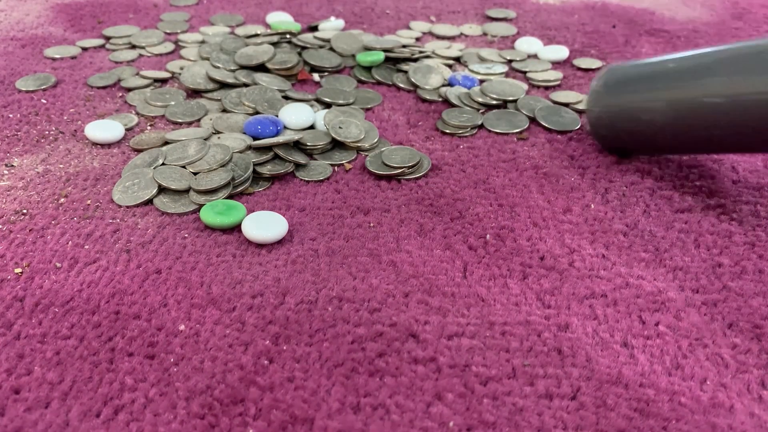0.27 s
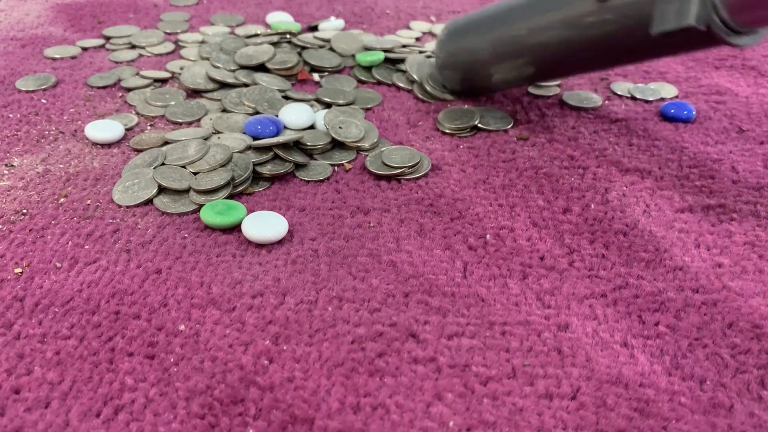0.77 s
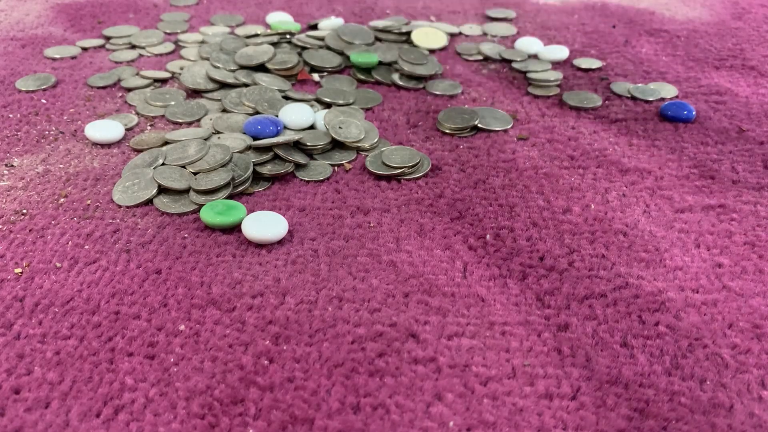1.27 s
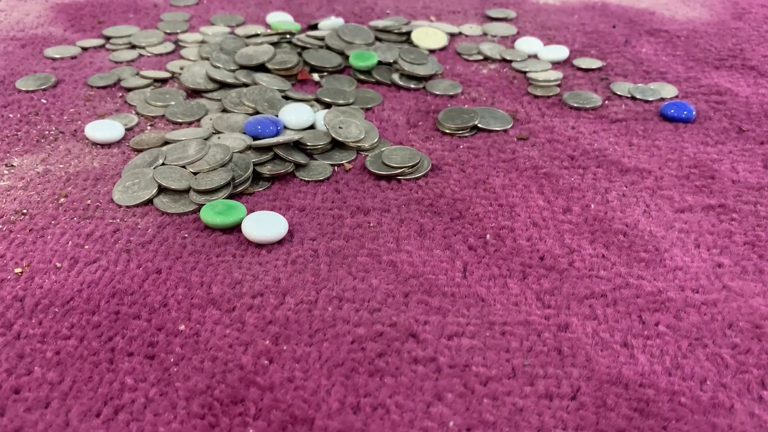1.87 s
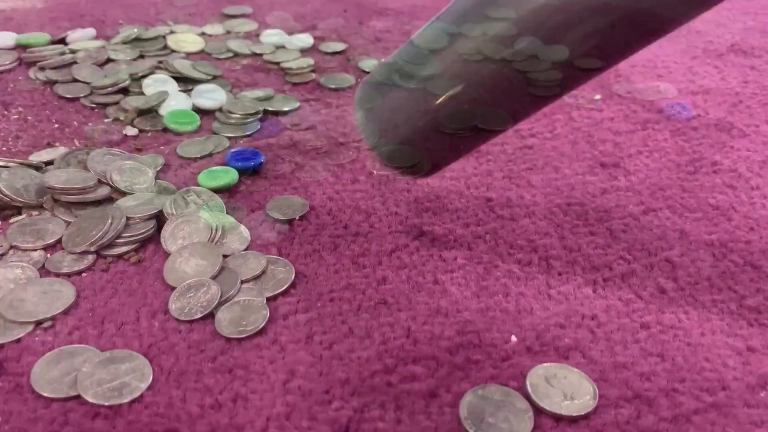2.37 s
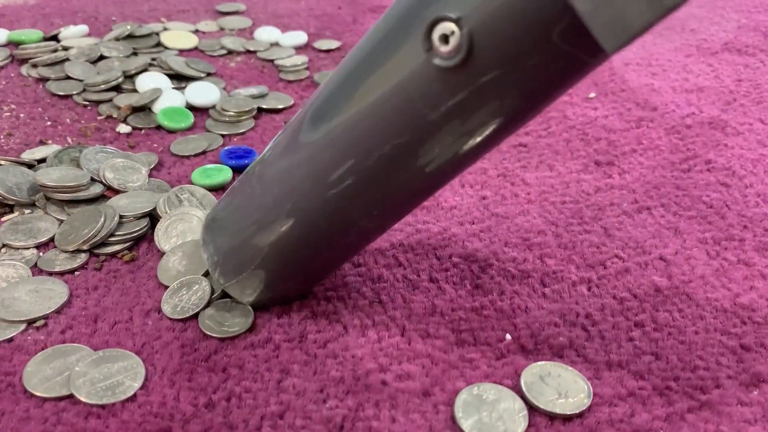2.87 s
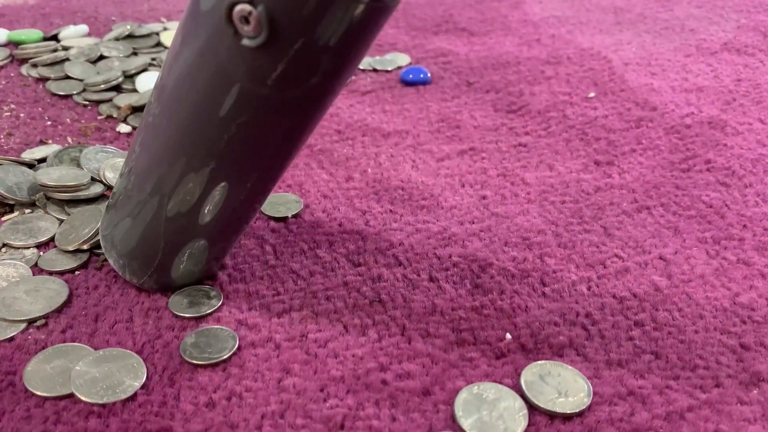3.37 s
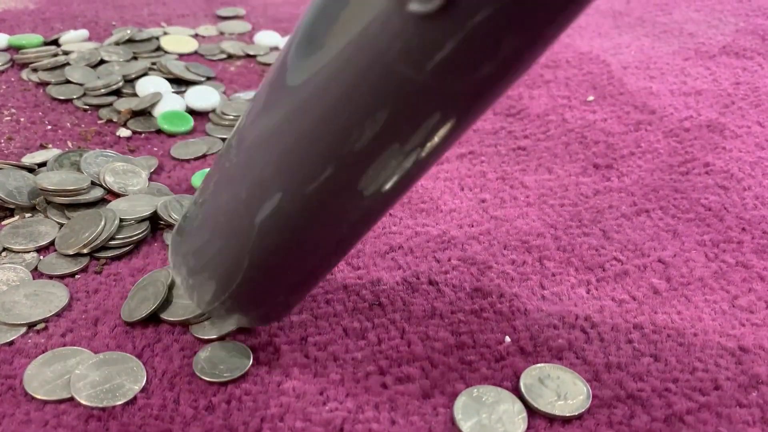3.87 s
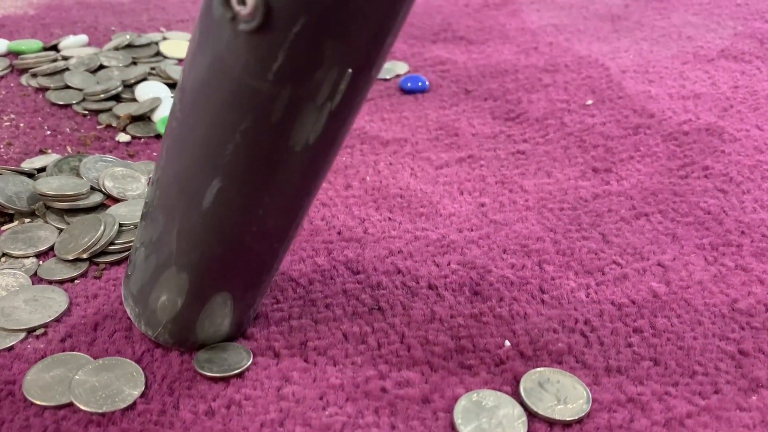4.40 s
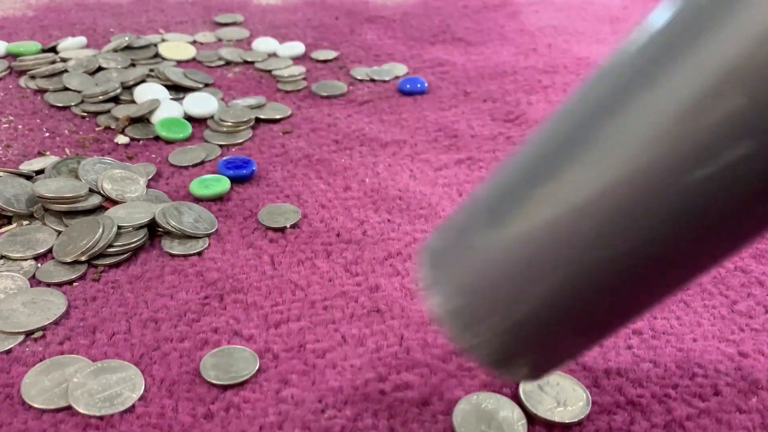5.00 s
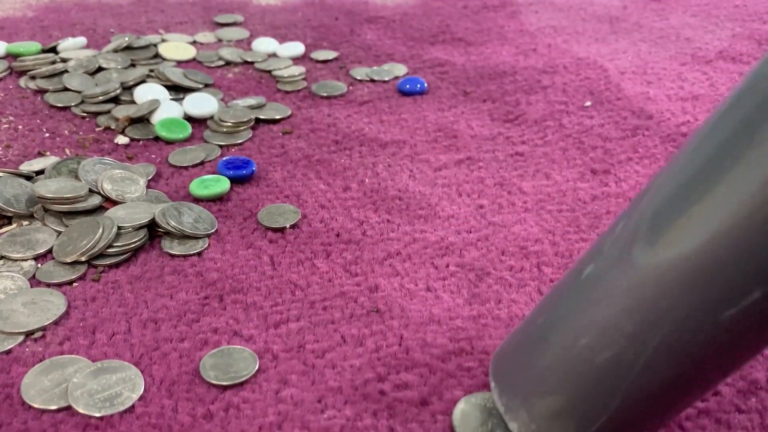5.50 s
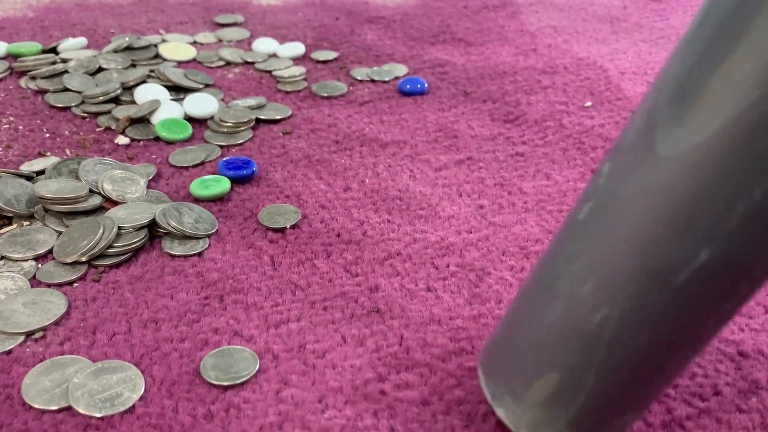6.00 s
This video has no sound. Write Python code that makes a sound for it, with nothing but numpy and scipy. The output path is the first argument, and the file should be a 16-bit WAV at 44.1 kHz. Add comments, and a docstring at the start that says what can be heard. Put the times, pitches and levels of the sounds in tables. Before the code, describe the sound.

A vacuum cleaner rushes steadily while its wand sucks coins and glass gems off carpet, clattering sharply up the hard tube in bursts.

```python
"""A vacuum cleaner runs while its wand picks coins and glass gems off a carpet, close to the microphone.
Shaped noise makes the rush of air and the hiss at the mouth; wavering sine tones make a faint motor whine.
Pieces clack together as short tones with noisy cracks, and tumble as streams of tiny ticks.
Blows on the tube wall ring clusters of close modes; the hardest overload the microphone.
The rim rasps and knocks, ringing the hollow nozzle; the wand bumps with low thuds, and a small room answers."""
import sys
import numpy as np
from scipy import signal
from scipy.fft import rfft, irfft
from scipy.io import wavfile

SR = 44100
rng = np.random.default_rng(int(sys.argv[2]) if len(sys.argv) > 2 else 0)


def digitize_waveform(pressure):
    """Quantize a signal to 16-bit integers and store it at the path in sys.argv[1].

    Rows of a 2-D input are taken as channels; values are limited to [-1, 1].
    """
    field = np.atleast_2d(pressure).T
    bounded = np.clip(field, -1, 1)
    quanta = np.round(bounded * 32767).astype(np.int16)
    wavfile.write(sys.argv[1], SR, quanta)


N = 275625  # length of the scene in samples

# colour of a hard contact's crack: (frequency [Hz], level [dB per Hz])
CRACK_SPECTRUM = [(60, -16.5), (900, -10.5), (2100, -1.5), (3600, 3), (5000, -3), (9000, -3), (16000, -8)]
CUTOFF_HZ = 16000  # top of the sound
NOZZLE_HZ, NOZZLE_Q = 2430, 4.3  # pitch and sharpness of the hollow nozzle's resonance


def from_db(db):
    """Turn decibels into a gain."""
    return 10 ** (np.asarray(db) / 20)


def rms_one(x):
    """Scale each row to unit power."""
    power = np.mean(x ** 2, axis=-1, keepdims=True)
    return x / np.sqrt(power + 1e-20)


def in_time(rows, outside=None):
    """Join the rows of a curve by straight lines, giving one signal per column after the time."""
    s, *columns = np.transpose(rows)
    t = np.arange(N) / SR
    return [np.interp(t, s, column, outside, outside) for column in columns]


def drift(rate_hz):
    """Slow random wander of spread 1: smoothed noise, made at every 40th sample and joined by lines."""
    step, warm_up = 40, 2000
    r = np.exp(-2 * np.pi * rate_hz * step / SR)
    noise = rng.standard_normal(N // step + warm_up + 2)
    slow = signal.lfilter([1], [1, -2 * r, r * r], noise)[warm_up:]
    return np.interp(np.arange(N) / step, np.arange(len(slow)), rms_one(slow))


def colour(x, spectrum):
    """Filter a sound to follow a spectrum, with no sound ahead of its cause (minimum phase)."""
    size = 2048
    hz, db = np.transpose(spectrum)
    grid = np.maximum(np.arange(size // 2 + 1) * SR / size, 1)
    gains = from_db(np.interp(np.log(grid), np.log(hz), db))
    # folding the cepstrum forward in time gives the minimum-phase response
    cepstrum = irfft(np.log(gains))
    fold = np.r_[1, np.full(size // 2 - 1, 2), 1, np.zeros(size // 2 - 1)]
    response = irfft(np.exp(rfft(cepstrum * fold)))
    response = response.reshape((1,) * (x.ndim - 1) + (-1,))
    return signal.fftconvolve(x, response, axes=-1)[..., :x.shape[-1]]


def place(times, db, sounds, span_s):
    """Lay one sound at each time, setting its level over its first span_s seconds."""
    out = np.zeros(N + sounds.shape[1])
    power = np.mean(sounds[:, :int(span_s * SR)] ** 2, axis=1)
    gains = from_db(db) / np.sqrt(power)
    for s, gain, sound in zip(times, gains, sounds):
        at = int(s * SR)
        out[at:at + len(sound)] += gain * sound
    return out[:N]


def air(flutter_db):
    """The machine's broad rush, and a brighter, fluttering hiss as the mouth nears the carpet."""
    # air flow, the rush ahead of a 1 dB lift: (time [s], rush level [dB], hiss level [dB])
    flow = [(0,-34.5,-39), (.27,-34,-37.5), (.4,-35.5,-32.5), (.8,-33.5,-40), (1.35,-29.5,-33.5),
            (1.65,-35,-40.5), (2.05,-38,-29.5), (2.2,-40,-39.5), (2.4,-39.5,-36.5), (2.62,-36.5,-32.5),
            (3.1,-35.5,-34), (4.1,-34.5,-34.5), (4.22,-36.5,-24.5), (4.78,-29.5,-37), (4.9,-34.5,-38.5),
            (5.3,-32.5,-35.5), (5.95,-37,-32.5), (6.25,-34.5,-36)]
    # colour of the rush: (frequency [Hz], level [dB per Hz])
    rush_spectrum = [(25, -23), (160, -8), (350, -2), (550, -5), (1000, 3), (1850, 0), (2500, -14.5),
                     (5000, -14.5), (9000, -18), (16000, -19.5)]
    # colour of the hiss: (frequency [Hz], level [dB per Hz])
    hiss_spectrum = [(400, -21.5), (1400, -10.5), (2100, 2), (3300, -1), (4500, -5.5), (6000, -10),
                     (10000, -16.5), (16000, -24)]
    rush_db, hiss_db = in_time(flow)
    rush_gain = from_db(rush_db + 1.0 + .5 * drift(29))
    rush = rush_gain * rms_one(colour(rng.standard_normal(N), rush_spectrum))
    hiss_gain = from_db(hiss_db + flutter_db * drift(17))
    hiss = hiss_gain * rms_one(colour(rng.standard_normal(N), hiss_spectrum))
    return rush + hiss


def motor():
    """Thin tones of the motor and its fan, all wandering slightly in pitch together."""
    # motor and fan tones: (frequency [Hz], level [dB], wander [Hz])
    whine = [(733.5, -55.5, 2.03), (10400, -57.5, 12), (74, -62.5, 1.02)]
    # extra level of the first tone, which fades into the rush: (time [s], level [dB])
    first_tone_level = [(.4, 12.5), (2.0, 3.5), (2.4, 2)]
    wander = drift(1.005)
    tones = []
    for hz, db, wander_hz in whine:
        phase = 2 * np.pi * np.cumsum(hz + wander_hz * wander) / SR
        tones.append(from_db(db) * np.sqrt(2) * np.sin(phase))
    first_db, = in_time(first_tone_level)
    return tones[0] * from_db(first_db) + sum(tones[1:])


def jostle(per_s, size_db, cycles, grit_db, count=16):
    """Small pieces tumble up the tube; each touch is a tick at one of count pitches, with a little crack."""
    # one table per mouthful of pieces, silent outside it: (time [s], level of the ticks [dB])
    mouthfuls = [
        [(.43,-22.5), (.48,-23.5)],
        [(.53,-27), (.6,-42), (.78,-33), (.86,-22), (.94,-24), (1.03,-28.5), (1.26,-21), (1.42,-21.5),
         (1.5,-34.5)],
        [(3.17,-35), (3.37,-30.5), (3.75,-31), (4.14,-36.5), (4.21,-25.5), (4.5,-26.5), (4.78,-25.5),
         (4.88,-39.5)],
        [(5.38,-36), (5.47,-32), (5.65,-42.5), (6.03,-30.5), (6.14,-41), (6.25,-53)],
    ]
    # colour of the ticks: (frequency [Hz], level [dB per Hz])
    tick_spectrum = [(500, -8.5), (2000, -4), (3300, -2), (6000, -2.5), (9000, -5), (16000, -25)]
    level, = sum(from_db(in_time(rows, outside=-120)) for rows in mouthfuls)
    sizes = from_db(size_db * np.clip(rng.standard_normal(N), -2, 2))
    hits = sizes * (rng.random(N) < per_s / SR)
    dealt = rng.integers(0, count, N)  # which pitch each touch gets
    ticks = 0
    for k, hz in enumerate(np.geomspace(2100, 8800, count)):
        r = from_db(-60 * hz / (cycles * SR))  # falls 60 dB in this many cycles
        w = 2 * np.pi * hz / SR
        own_hits = hits * (dealt == k) + 1e-18
        ticks = ticks + signal.lfilter([0, np.sin(w)], [1, -2 * r * np.cos(w), r * r], own_hits)
    grit_fade = signal.lfilter([1], [1, -from_db(-60 / (0.0074 * SR))], hits + 1e-18)
    grit = grit_fade * rng.standard_normal(N)
    ticks = rms_one(colour(ticks, tick_spectrum))
    return level * (ticks + from_db(grit_db) * rms_one(colour(grit, CRACK_SPECTRUM)))


def cracks(count, t60, tail_db, tail_t60):
    """A hard contact is a fast-fading burst of noise, with a weaker, slower-fading noise tail."""
    t = np.arange(int(SR / 20)) / SR
    fade = from_db(-60 * t / t60) + from_db(tail_db - 60 * t / tail_t60)
    return colour(rng.standard_normal((count, len(t))) * fade, CRACK_SPECTRUM)


def clacks(rows, t60, knock_db, crack_db, reach):
    """Each loose contact is a quickly damped tone plus a crack; lower contacts have a duller crack."""
    s, db, hz = np.transpose(rows)
    t = np.arange(int(SR / 50)) / SR
    knocks = np.sin(2 * np.pi * np.outer(hz, t)) * from_db(-60 * t / t60)
    snaps = cracks(len(s), t60=0.0054, tail_db=-12.5, tail_t60=0.021)
    edges = np.minimum(reach * hz, CUTOFF_HZ)  # the crack reaches this high [Hz]
    dulled = []
    for edge, snap in zip(edges, snaps):
        b, a = signal.butter(2, edge, fs=SR)
        dulled.append(signal.lfilter(b, a, snap))
    knock_layer = place(s, db + knock_db, knocks, span_s=0.0027)
    return knock_layer + place(s, db + crack_db, np.array(dulled), span_s=0.003)


def tube_ring(times, db, reach, damping, uneven_db, count=14):
    """Each ring mode has a ladder of lengthwise overtones; the upper ones die first, so the ring sinks."""
    # ring modes of the tube's cross-section:
    # (lowest frequency [Hz], spread of its overtones [Hz], level [dB], 60 dB fade of the lowest [s])
    tube_modes = [(1866, 380, 2.5, 0.039), (5270, 676, 1, 0.1), (10056, 910, -2.5, 0.1)]
    t = np.arange(int(SR * .15)) / SR
    k = np.arange(count)
    ladder = (k / count) ** 2
    spot = reach * rng.uniform(0.19, 1, (len(times), 1))  # where along the tube the piece lands
    out = 0
    for hz, spread_hz, mode_db, t60 in tube_modes:
        modes = np.sin(2 * np.pi * np.outer(hz + spread_hz * ladder, t))
        modes *= from_db(-60 * np.outer(1 + damping * ladder, t) / t60)
        # the landing spot decides how strongly each overtone is struck, with some chance
        chance = 1 + 0.72 * rng.standard_normal((len(times), count))
        weights = np.cos(np.pi * k * spot) * np.sqrt(k + 1) * chance
        gains = from_db(mode_db + uneven_db * rng.standard_normal((len(times), 1)))
        out = out + gains * (weights @ modes)
    return place(times, db, out, span_s=0.0028)


def strikes(rows):
    """Pieces skid against the tube wall with a noisy crack and set it ringing."""
    s, db, ring_db = np.transpose(rows)
    bursts = cracks(len(s), t60=0.0078, tail_db=-16, tail_t60=0.033)
    skids = place(s, db + 2.0, bursts, span_s=0.0031)
    return skids + tube_ring(s, ring_db + 2.0, reach=0.33, damping=7, uneven_db=2.8)


def bumps(t60, corner_hz, level_db):
    """The wand knocks softly on the carpet: a short burst of noise with only its lows left."""
    # dull bumps, relative to level_db: (time [s], level [dB])
    thud_rows = [(0.603, -13), (0.706, -8), (0.874, -6), (1.233, -8), (1.371, -2), (1.6, -24), (1.969, -30),
                 (2.745, -26), (3.579, -14), (3.78, -13), (4.318, -10), (4.692, -20), (4.794, -21),
                 (5.484, -12), (5.634, -22), (6.172, -15)]
    s, db = np.transpose(thud_rows)
    t = np.arange(int(SR / 10)) / SR
    push = rng.standard_normal((len(s), len(t))) * from_db(-60 * t / t60)
    thuds = signal.sosfilt(signal.butter(2, corner_hz, fs=SR, output="sos"), push)
    return place(s, db + level_db, thuds, span_s=0.01)


def ricochets(count=24):
    """Each handful bounces on at uneven gaps; gives wall strikes (s, dB, ring dB) and clacks (s, dB, Hz)."""
    # handfuls going up the tube, levels relative:
    # (start [s], length [s], contact level [dB], tube ring level [dB])
    handfuls = [(0.669, .14, -8, -10.5), (0.922, .07, -18.5, -19), (1.061, .055, -15.5, -10.5),
                (1.141, .025, -10, -14), (1.196, .045, -9.5, -9), (1.245, .075, -5, -3),
                (1.36, .036, -13, -13), (3.822, .03, -21, -21), (4.33, .24, -19.5, -25.5),
                (5.412, .012, -15.5, -13.5), (6.08, .008, -7, -20)]
    # range of the clacks' pitches: (lowest [Hz], highest [Hz])
    lowest_hz, highest_hz = (1880, 5600)
    rate_per_s, uneven = 85, .45  # typical rate; log spread of the gaps
    spread_db = 4  # spread of strength
    wall_share = .65  # chance that a bounce hits the wall; otherwise it hits another piece
    on_wall, on_piece = [], []
    for start, length, db, ring_db in handfuls:
        gap, force, ring = rng.standard_normal((3, count))
        target, size = rng.random((2, count))
        gaps = np.exp(uneven * gap) / rate_per_s
        s = start + np.cumsum(gaps) - gaps[0]
        inside = s < start + length
        wall = target < wall_share
        level = db + spread_db * force
        ring_level = ring_db + spread_db * ring
        hz = lowest_hz * (highest_hz / lowest_hz) ** size
        on_wall.append(np.c_[s, level, ring_level][inside & wall])
        on_piece.append(np.c_[s, level, hz][inside & ~wall])
    return np.vstack(on_wall), np.vstack(on_piece)


def coins():
    """The single hard blows and clacks, and the ricochets between them."""
    # hardest single blows on the wall, relative: (time [s], peak level [dB], tube ring level [dB])
    hard_blows = [(0.5453, 2, -25), (0.5942, 3, -18), (0.6052, 6, -10), (0.6319, 11, -8.5),
                  (0.6416, -3, -23), (0.6632, 2, -9), (0.6887, 0, -9.5), (0.7095, 4, -10),
                  (0.7474, 7, -11.5), (0.772, -4, -13), (0.7981, 2, -10), (0.82, 1, -14), (0.9774, -8, -19),
                  (1.0099, -3, -13.5), (1.0566, -12, -21), (1.1403, 6, -11), (1.1839, 10, 0), (1.26, 5, 1),
                  (1.2899, 1, 0), (1.3489, 7, -9), (1.3846, 6, -17), (3.321, -7, -25.5), (3.4206, -8, -27),
                  (3.4544, 3, -19), (3.5118, 2.5, -19), (3.5439, -2.5, -27), (3.591, -6, -20),
                  (3.6135, 6, -11.5), (3.6965, 4.5, -22), (3.7773, -2, -22), (3.8043, 1, -18),
                  (4.4115, -4, -17.5), (4.5045, -4.5, -24), (4.5449, -4, -16), (4.584, -2, -19.5),
                  (4.6038, -6, -21), (5.4204, -3, -23), (5.4454, -8, -30), (5.4853, -1.5, -27),
                  (6.0746, -4, -17), (6.098, 3, -15)]
    # loudest clacks of pieces on each other and the nozzle, relative: (time [s], peak level [dB], pitch [Hz])
    loud_clacks = [(0.4365, -1.5, 3360), (0.4666, -9, 2430), (0.5717, -2, 4180), (0.5842, 6, 5570),
                   (0.876, 0, 1870), (0.8921, 3, 1870), (0.9119, -3.5, 2190), (1.4115, 0, 2720),
                   (1.4315, 8, 5360), (3.258, -8.5, 3650), (3.2835, 0.5, 5600), (3.3509, -2, 5700),
                   (3.3907, -7, 3680), (3.5776, 2, 4110), (3.5846, -2, 5320), (3.6398, -10, 2370),
                   (3.6581, 4, 3930), (3.6798, 3, 4870), (3.737, 1, 2210), (3.7499, 7, 3500),
                   (3.874, 3, 3680), (3.918, -1.5, 4900), (3.9308, -5.5, 2280), (3.9577, -4.5, 4000),
                   (4.0175, -3, 4040), (4.0781, -6.5, 2280), (4.2378, -5, 3060), (4.2637, 0, 5550),
                   (4.2743, -1, 3170), (4.3183, 4, 3970), (4.6334, 3.5, 1890), (4.6815, 4, 3670),
                   (4.69, 5, 3560), (4.7199, 1.5, 1780), (4.7682, 1, 2270), (4.8092, 3, 1990),
                   (5.307, -2, 3650), (5.3393, -8.5, 2370), (5.4388, -1, 1890), (5.4998, -2, 3380),
                   (5.5832, -7, 2210), (5.6105, -5.5, 2230), (5.6873, -3.5, 2700), (5.6987, -0.5, 3180),
                   (5.7309, 0, 2920), (5.792, -1.5, 5650), (5.7978, -8, 5370), (5.8436, -7, 2880),
                   (5.8511, 3, 4100), (5.97, -2.5, 3230), (6.0488, 5, 3100), (6.137, 4, 2770),
                   (6.1554, -1, 3430), (6.1604, -4, 3830), (6.1724, 6, 3480), (6.177, -6, 3840),
                   (6.1904, -4, 5330), (6.2078, -3.5, 4280), (6.2276, -5.5, 2800)]
    clack_crest_db, strike_crest_db = 12.5, 9  # peak over body of a clack and of a wall strike
    ring_gain_db = 3  # onset of the ring over its mean
    on_wall, on_piece = ricochets()
    on_wall = np.vstack([np.add(hard_blows, [0, -strike_crest_db, ring_gain_db]), on_wall])
    on_piece = np.vstack([np.add(loud_clacks, [0, -clack_crest_db, 0]), on_piece])
    together = clacks(on_piece, t60=0.006, knock_db=-1.8, crack_db=0.1, reach=3.43)
    return together + strikes(on_wall)


def touches(per_s, size_db, t60):
    """Many light contacts at random moments, a few harder than the rest, each a fading bit of noise."""
    sizes = from_db(size_db * np.minimum(rng.exponential(1, N), 3))
    hits = sizes * (rng.random(N) < per_s / SR)
    fade = signal.lfilter([1], [1, -from_db(-60 / (t60 * SR))], hits + 1e-18)
    return fade * rng.standard_normal(N)


def drag():
    """The rim catches and slips on the pile; each slip rasps and rings the hollow nozzle."""
    # one table per stroke over the carpet, levels relative:
    # (time [s], rasp level [dB], hollow ring level [dB])
    strokes = [
        [(1.47, -31.5, -49), (1.62, -27, -59), (1.68, -32, -33), (1.86, -26, -30), (1.96, -29, -27),
         (2.07, -24, -42), (2.16, -42, -66)],
        [(4.93, -34, -42), (5.05, -30.5, -32), (5.13, -30, -18.5), (5.22, -31, -29), (5.28, -27, -34),
         (5.38, -36, -29)],
    ]
    # colour of the rasp: (frequency [Hz], level [dB per Hz])
    rasp_spectrum = [(300, -1.5), (900, 3.5), (4200, 5), (5900, 2), (8200, 3), (10200, -3.5), (16000, -7.5)]
    rasp, hollow = sum(from_db(in_time(rows, outside=-120)) for rows in strokes)
    slips = touches(per_s=480, size_db=3.0, t60=0.014)
    b, a = signal.iirpeak(NOZZLE_HZ, NOZZLE_Q, fs=SR)
    nozzle = signal.lfilter(b, a, slips)
    scrape = from_db(-2.5) * rasp * rms_one(colour(slips, rasp_spectrum))
    return scrape + from_db(-4.0) * hollow * rms_one(nozzle)


def rim_knocks(t60):
    """A coin bumps the rim without a crack; only the nozzle's air answers, as a short fading tone."""
    # soft knocks on the rim: (time [s], level [dB])
    knock_rows = [(1.8434, -17), (1.873, -18), (1.927, -18), (5.0593, -11)]
    s, db = np.transpose(knock_rows)
    t = np.arange(int(SR / 20)) / SR
    ring = np.sin(2 * np.pi * NOZZLE_HZ * t) * from_db(-60 * t / t60)
    return place(s, db, np.tile(ring, (len(s), 1)), span_s=.003)


def room(x, t60, wet_db, dull_hz):
    """A carpeted room answers with a short, dull tail of fading noise, 5 ms late."""
    t = np.arange(int(SR / 2)) / SR
    tail = rng.standard_normal(len(t)) * from_db(-60 * t / t60) * (t > .005)
    tail = tail / np.linalg.norm(tail)
    tail = signal.sosfilt(signal.butter(1, dull_hz, fs=SR, output="sos"), tail)
    return from_db(wet_db) * signal.fftconvolve(x, tail)[:N]


def scene():
    """The rattle and the dragging rim over the running machine, in one channel."""
    machine = air(flutter_db=1.35) + motor()
    small = jostle(per_s=230, size_db=4.0, cycles=17.4, grit_db=3.0)
    wand = drag() + rim_knocks(t60=0.021)
    thuds = bumps(t60=0.035, corner_hz=167, level_db=-17.0)
    near = small + wand + coins()
    echo = room(near, t60=0.071, wet_db=-20.0, dull_hz=7060)
    return (near + echo + thuds + machine)[None]


def record(dry):
    """The microphone overloads: the loudest peaks are flattened smoothly, then the top is cut."""
    top = 0.68  # the flattened peaks approach this level
    clipped = dry / (1 + (dry / top) ** 4) ** (1 / 4)
    low_pass = signal.ellip(10, .1, 80, CUTOFF_HZ, fs=SR, output="sos")
    return signal.sosfilt(low_pass, clipped)


dry = scene()
out = record(dry)
digitize_waveform(out)
```